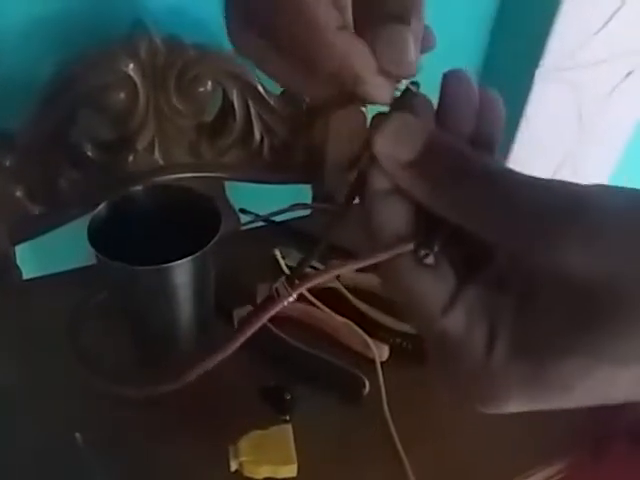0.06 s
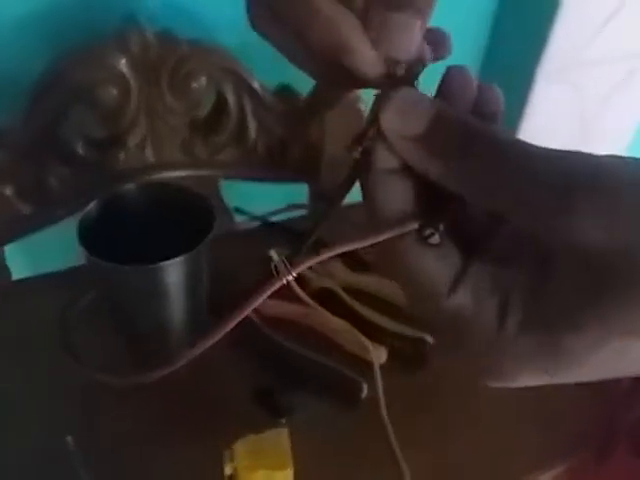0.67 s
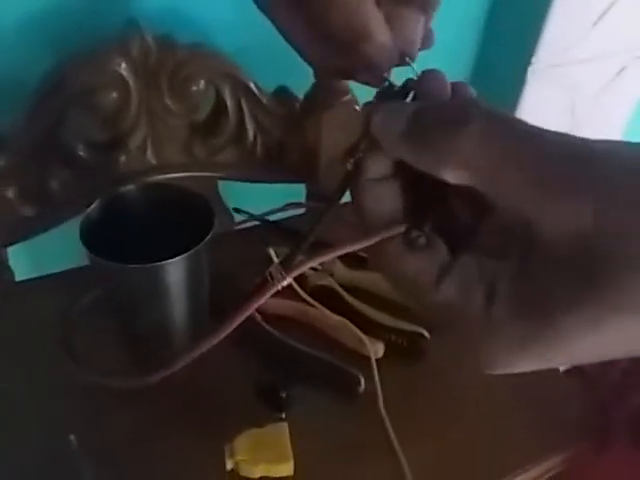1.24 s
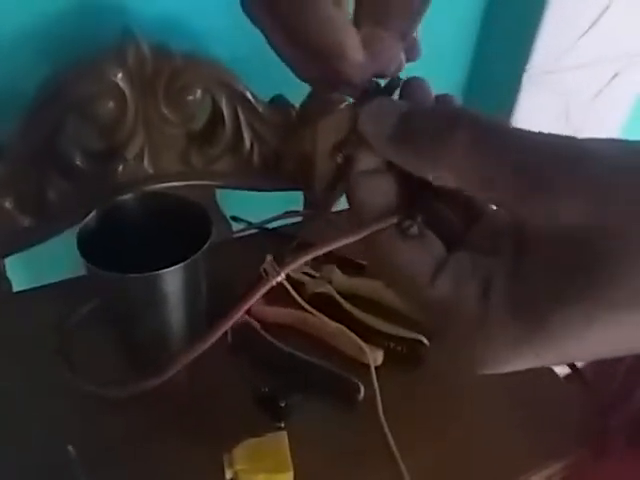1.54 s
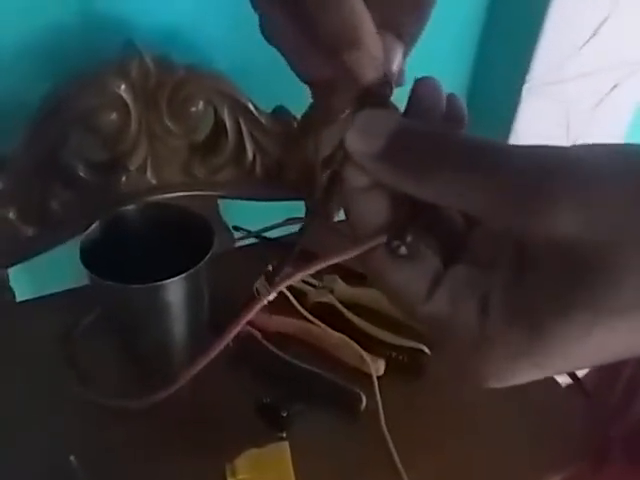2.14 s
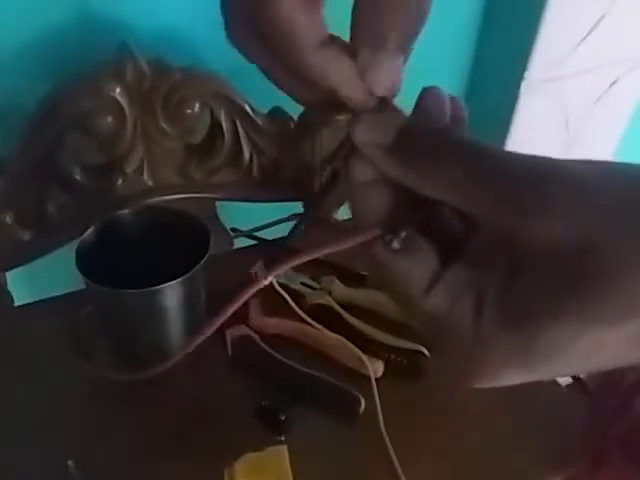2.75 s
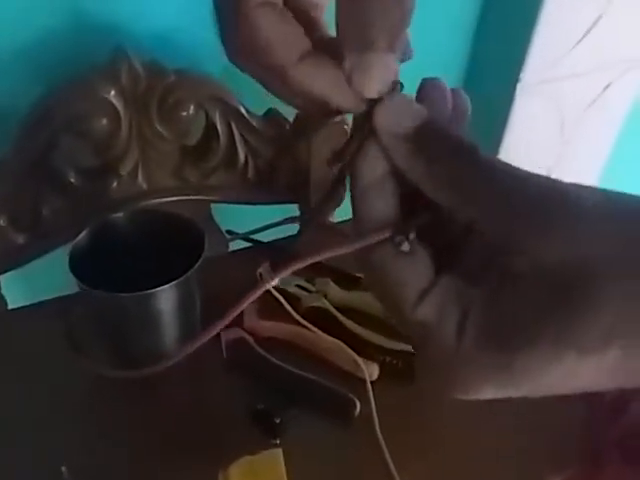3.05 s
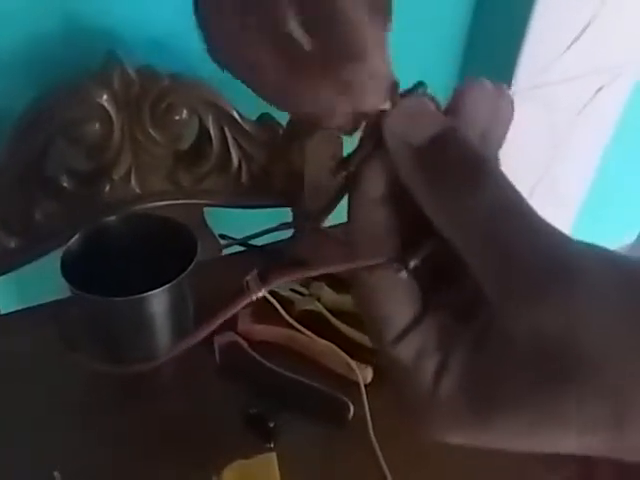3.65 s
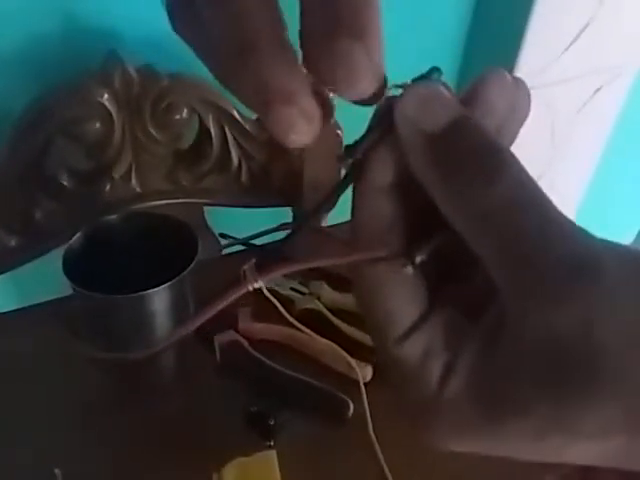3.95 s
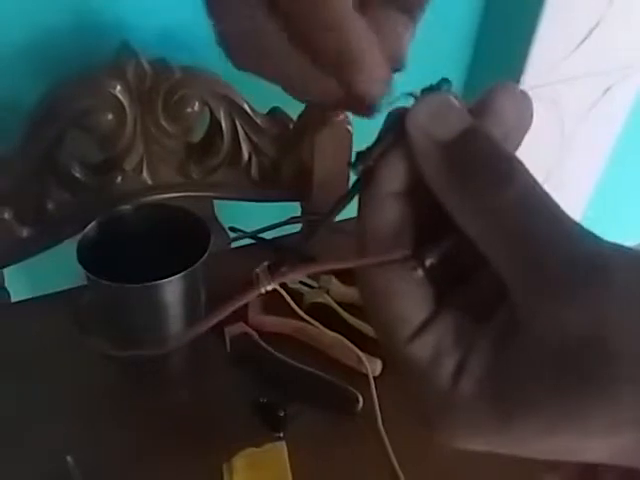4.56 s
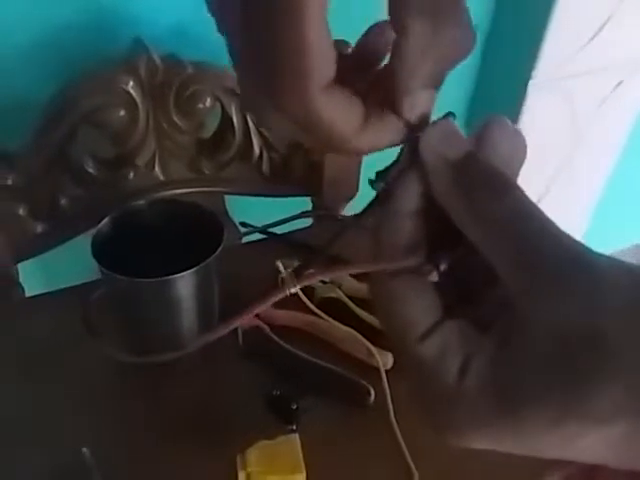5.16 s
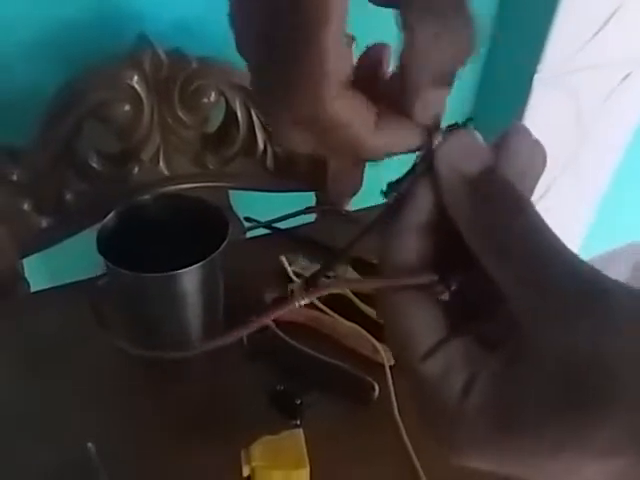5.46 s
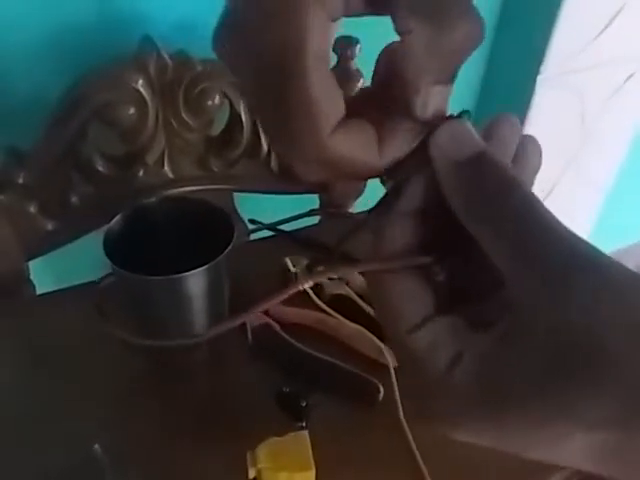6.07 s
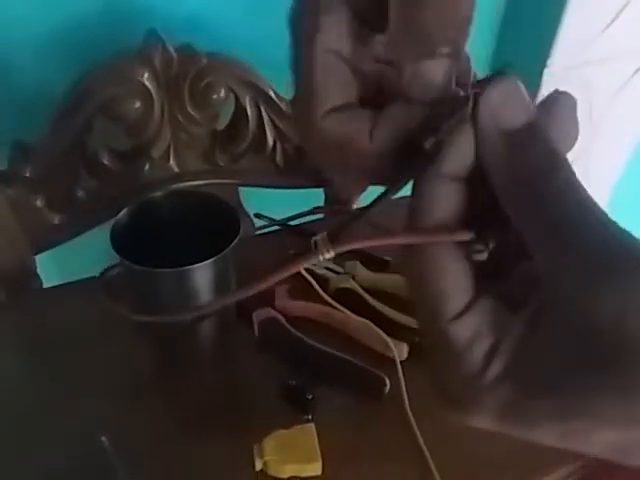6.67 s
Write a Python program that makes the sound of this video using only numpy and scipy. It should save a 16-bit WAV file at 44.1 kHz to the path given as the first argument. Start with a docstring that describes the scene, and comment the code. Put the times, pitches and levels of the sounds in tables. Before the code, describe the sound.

An unseen fan runs throughout in a small room, making a low, rapidly throbbing hum with a weaker drone above it. Air rumbles in gentle puffs and rushes softly. One faint, dull tap comes near the start. From about halfway, the boom eases and the sound grows slightly brighter, with faint ringing tones, as if the air stream were reaching the microphone. A light hiss lies underneath.

```python
"""In a small room, a fan turns. Each passing blade pushes a pulse of air that booms in the room's
low resonances, about 15.5 times a second, and a weaker drone answers between the throbs.
Air rumbles in puffs and rushes softly with a few faint ringing tones. The microphone goes from
sheltered to open in the air stream, and the sound grows brighter as the boom eases.
There is one faint tap, and the steady hiss of the microphone."""
import sys
import numpy as np
from scipy.fft import rfft, irfft, next_fast_len
from scipy.io import wavfile

SR = 44100
rng = np.random.default_rng(int(sys.argv[2]) if len(sys.argv) > 2 else 0)


def digitize_waveform(pressure):
    """Quantize a signal to 16-bit integers and store it at the path in sys.argv[1].

    Rows of a 2-D input are taken as channels; values are limited to [-1, 1].
    """
    field = np.atleast_2d(pressure).T
    bounded = np.clip(field, -1, 1)
    quanta = np.round(bounded * 32767).astype(np.int16)
    wavfile.write(sys.argv[1], SR, quanta)


N = 305172

# The tone of one boom: (frequency [Hz], sheltered level [relative dB], open level [relative dB])
BOOM_TONE = [(29.5, -47, -50), (45.7, -24, -22.5), (63.5, -31, -17), (76, -3, -5), (100.7, 2, 2.5),
             (110.3, -6.5, -3), (118.6, -28.5, -9), (141, -14.5, -10.5), (156, -23.5, -25.5),
             (225, -56, -51), (400, -110, -110)]

def blade_boom(passes, openness, puff):
    """Each blade leaves a dip in pressure that booms; the boom eases as the air stream opens."""
    dips = -air_pulses(passes, scatter_db=0.38, jitter_s=0.0002)
    boom = room_resonance(dips, BOOM_TONE, openness, smears=(-.007, .013), pivot_hz=77.3)
    level_db = -38 - 7 * smooth_step(midpoint_s=3.29, ease_s=0.54) + 1.5 * puff
    return amp(level_db) * boom


# The tone of the drone: (frequency [Hz], sheltered level [relative dB], open level [relative dB])
DRONE_TONE = [(110, -38, -32), (144, -5.5, -1), (161, -9, -7), (173, -12.5, -8.5), (183, -8.5, -2),
              (206.7, 5, -8.5), (216.9, -3, 6.5), (236.5, -6.5, -5), (257, -17, -8), (269, -14.5, -17.5),
              (273, -4.5, -9.5), (296, -22, -12.5), (315, -23, -37), (427, -64, -56), (900, -100, -100)]
# How loud the drone is: (time [s], level [dB])
DRONE_LOUDNESS = [(0.0, -59.5), (1.1, -50.5), (2.65, -53.5), (3.1, -60.5), (3.8, -60.5), (4.3, -54.5),
                  (5.6, -51), (6.92, -55)]

def blade_drone(passes, openness, early_lag=0.1198, late_lag=.63):
    """A higher drone follows each blade twice: weakly at once, then fully most of a pass behind it."""
    late = air_pulses(passes - late_lag, scatter_db=0.84, jitter_s=0.00022)
    early = amp(-10.5) * air_pulses(passes - early_lag, scatter_db=1.5, jitter_s=0.0012)
    drone = room_resonance(late + early, DRONE_TONE, openness, smears=(.012, .009), pivot_hz=213.0)
    return amp(curves(DRONE_LOUDNESS)[0]) * drone


# How fast the fan runs: (time [s], blade passes [per second])
FAN_SPEED = [(0.0, 15.634), (0.8, 15.909), (1.7, 15.652), (3.2, 15.472), (4.7, 15.557), (5.9, 15.385),
             (6.92, 15.429)]

def blade_passes(start=-.249):
    """Count the blades going by: each whole number is one pass."""
    return start + np.cumsum(curves(FAN_SPEED)[0]) / SR


def air_pulses(passes, scatter_db, jitter_s):
    """Each blade pushes one pulse of air, a little uneven in size and timing."""
    at = np.flatnonzero(np.diff(np.floor(passes)) > 0)
    timing, size = rng.standard_normal((len(at), 2)).T
    at = np.clip(at + jitter_s * SR * timing, 0, N - 1).astype(int)
    return np.bincount(at, amp(scatter_db * size), N)


def room_resonance(pulses, table, openness, smears, pivot_hz):
    """Pulses swell and fade in the room. Smears (sheltered, open) delay the highs, in s per octave."""
    def tone(points, smear):
        def response(hz):
            phase = 2 * np.pi * smear * (hz * np.log((hz + 1) / pivot_hz) - hz + pivot_hz) / np.log(2)
            return amp(along(points, hz)) * np.exp(-1j * phase)
        return unit(filtered(pulses, response))
    sheltered = tone([(hz, db) for hz, db, _ in table], smears[0])
    opened = tone([(hz, db) for hz, _, db in table], smears[1])
    return unit((1 - openness) * sheltered + openness * opened)


# The tone of swirling air: (frequency [Hz], level [relative dB])
RUMBLE_TONE = [(25, -34), (35, -25.5), (47, -7.5), (65, -3), (92, -4.5), (115, 1.5), (140, -1), (300, -45),
               (900, -120)]

def air_rumble(passes, openness, puff, sheltered_db=-52, open_db=-53):
    """Swirling air rumbles, swelling with each puff and throbbing with the blades, weakest as a blade goes by."""
    level_db = (1 - openness) * sheltered_db + openness * open_db + 1.5 * puff
    flutter_db = -2.4 * np.cos(2 * np.pi * passes)
    return amp(level_db + flutter_db) * noise(lambda hz: amp(along(RUMBLE_TONE, hz)))


# Stronger puffs of air: (time [s], strength [0-1])
PUFFS = [(.3, 0.85), (1.12, 0.6), (2.62, 0.4), (3.0, 1.0), (3.65, 0.7), (5.45, 0.36), (6.65, 1)]

def air_puffs(half_width_s=0.13):
    """Each puff of air swells and dies away in the same bell shape."""
    t = np.arange(N) / SR
    return sum(strength * np.exp(-.5 * ((t - at) / half_width_s) ** 2) for at, strength in PUFFS)


# The tone of rushing air: (frequency [Hz], sheltered level [relative dB], open level [relative dB])
RUSH_TONE = [(30, -22, -22), (52.7, -1, -5), (92, 16, 8.5), (148, 12, 12.5), (220, 14, 11), (292.5, 8, 8),
             (354, 0, -2), (720, -3, -3.5), (990, -2.5, -3), (1302, -6.5, -5.5), (1760, -11.5, -12.5),
             (2090, -14, -12), (3240, -23.5, -24.5), (6260, -40, -40.5)]

def air_rush(passes, level_db=-54):
    """The rush brightens as the air stream opens, and flutters slightly with the blades."""
    sheltered = noise(lambda f: amp(along([(hz, db) for hz, db, _ in RUSH_TONE], f)))
    opened = noise(lambda f: amp(along([(hz, db) for hz, _, db in RUSH_TONE], f)))
    flutter_db = 0.8 * np.cos(2 * np.pi * passes)
    return amp(level_db + flutter_db) * open_up(sheltered, opened, midpoint_s=3.89)


# Tones the air rings: (pitch [Hz], width [Hz], sheltered level [relative dB], open level [relative dB])
RINGING_TONES = [(428.2, 3.7, -19, 13), (537, 30, 2, 5), (593.7, 3.9, 11, 8.5), (616, 9.6, -16, 9.5),
                 (688, 14, -12, 7), (815, 9.9, -12, 2), (1112, 14.4, -5, 9.5), (1170, 40, -11, -10),
                 (2140, 110, -9, 1)]

def air_ringing(sheltered_db=-69.5, open_db=-63.5):
    """The rushing air rings narrow resonances, more of them once the stream is open."""
    rush = [(hz, db) for hz, _, db in RUSH_TONE]
    def ring(tones):
        def peaks(f):
            return sum(amp(db) ** 2 / (1 + (2 * (f - hz) / width) ** 2) for hz, width, db in tones)
        return noise(lambda f: amp(along(rush, f)) * np.sqrt(peaks(f)))
    sheltered = ring([(hz, width, db) for hz, width, db, _ in RINGING_TONES])
    opened = ring([(hz, width, db) for hz, width, _, db in RINGING_TONES])
    return open_up(amp(sheltered_db) * sheltered, amp(open_db) * opened, midpoint_s=5.36)


def tap(at_s=0.593, level_db=-49, ring_hz=410, fade_s=0.046):
    """One faint, dull tap: a single tone that dies away quickly."""
    t = np.maximum(np.arange(N) / SR - at_s, 0)
    return amp(level_db - 60 * t / fade_s) * np.sin(2 * np.pi * ring_hz * t)


def smooth_step(midpoint_s, ease_s):
    """A smooth rise from 0 to 1; a larger ease_s makes it slower."""
    return 1 / (1 + np.exp((midpoint_s - np.arange(N) / SR) / ease_s))


def open_up(sheltered, opened, midpoint_s):
    """One noise gives way to another as the air stream opens."""
    share = smooth_step(midpoint_s, ease_s=0.34)
    return np.sqrt(1 - share) * sheltered + np.sqrt(share) * opened


def amp(db):
    return 10 ** (np.asarray(db) / 20)


def unit(x):
    return x / np.sqrt(np.mean(x ** 2) + 1e-20)


def along(points, hz):
    """(Hz, value) points on a log axis."""
    f, v = np.transpose(points)
    return np.interp(np.log(hz + 1), np.log(f + 1), v)


def curves(rows):
    """One value per sample for each column after the time."""
    s, *cols = np.transpose(rows)
    return [np.interp(np.arange(N) / SR, s, c) for c in cols]


def filtered(x, response):
    """x times a response of frequency."""
    m = next_fast_len(N + SR // 2)
    return irfft(rfft(x, m) * response(np.fft.rfftfreq(m, 1 / SR)), m)[:N]


def noise(response):
    """Coloured noise of rms 1."""
    return unit(filtered(rng.standard_normal(N), response))


def scene():
    """The fan's blades and moving air play together, with one tap."""
    passes = blade_passes()
    before, after = 0.06, 0.98  # 0 is sheltered, 1 is open to the air stream
    openness = before + (after - before) * smooth_step(midpoint_s=4.22, ease_s=0.64)
    puff = air_puffs()
    blades = blade_boom(passes, openness, puff) + blade_drone(passes, openness)
    air = air_rumble(passes, openness, puff) + air_rush(passes) + air_ringing()
    return (blades + air + tap())[None]


# The tone of the microphone's hiss: (frequency [Hz], level [relative dB])
HISS_TONE = [(300, -3.5), (3000, -7), (5000, -7.5), (6500, -5), (8000, -1.5), (10000, 0.5), (13000, -.5),
             (16000, -.5)]

def record(dry, top_hz=15750):
    """The microphone adds its own hiss and keeps nothing above top_hz."""
    hiss = amp(-69.0) * noise(lambda hz: amp(along(HISS_TONE, hz)))
    return filtered(dry[0] + hiss, lambda hz: hz < top_hz)[None]


dry = scene()
out = record(dry)
digitize_waveform(out)
```